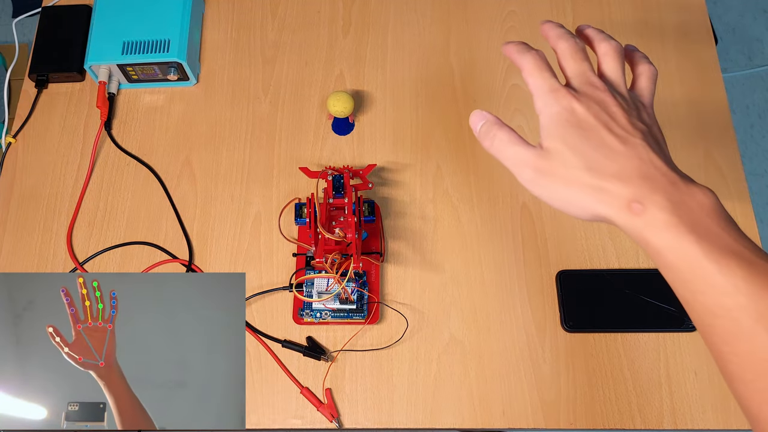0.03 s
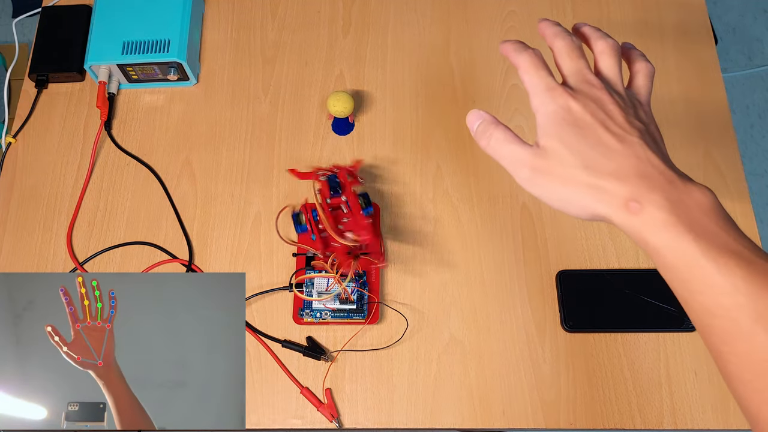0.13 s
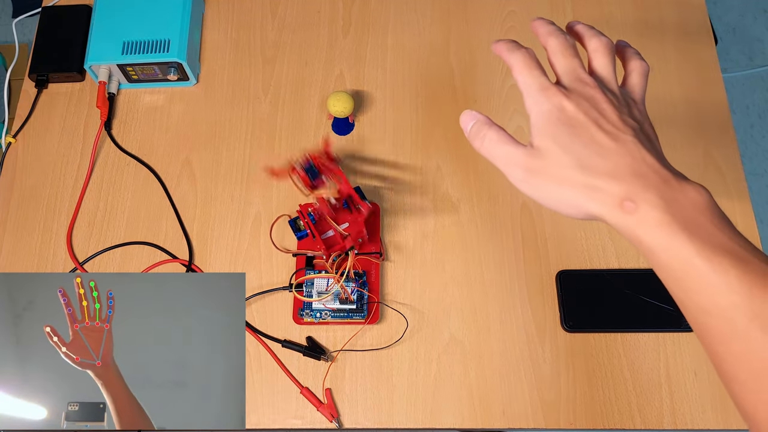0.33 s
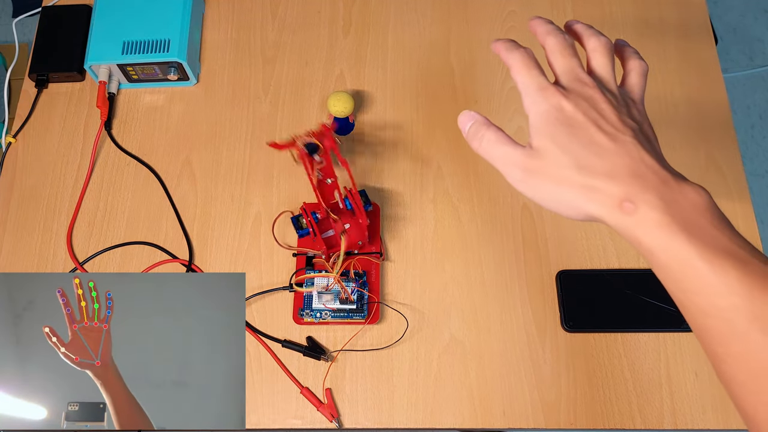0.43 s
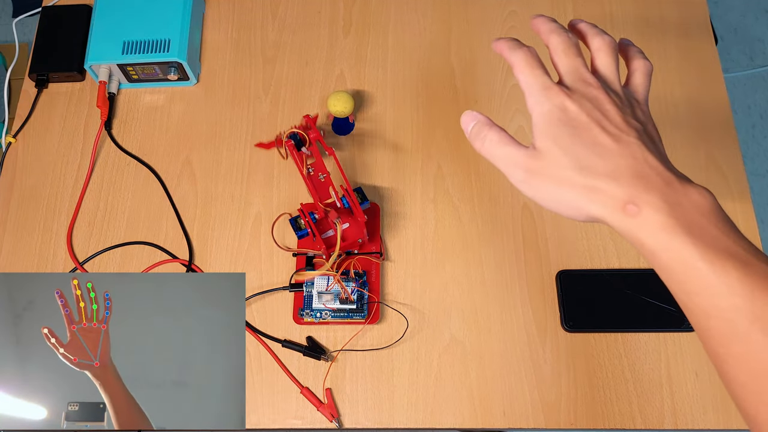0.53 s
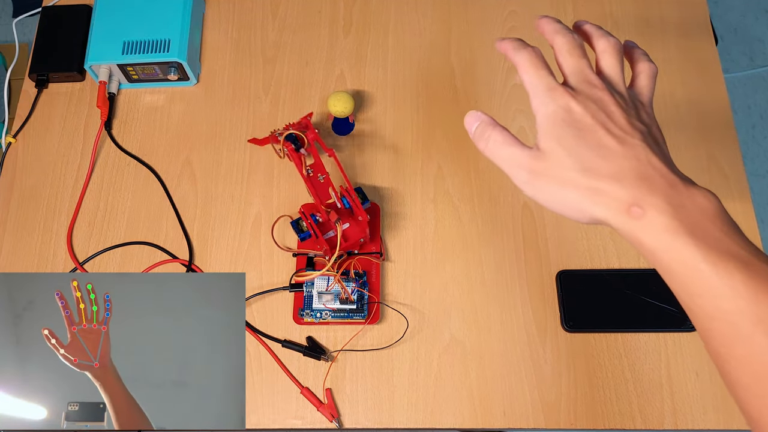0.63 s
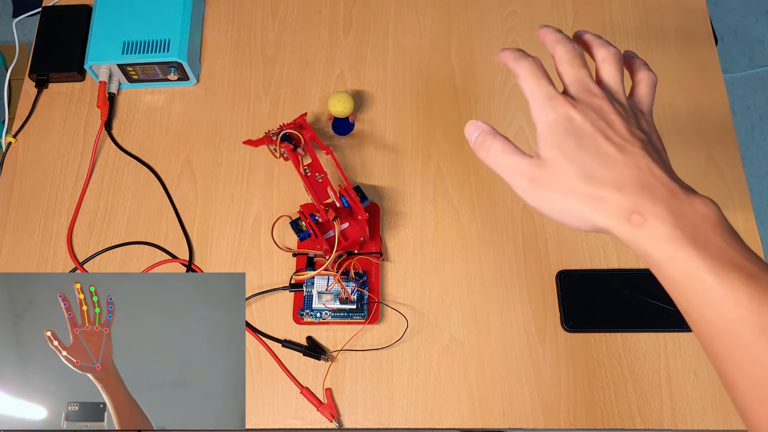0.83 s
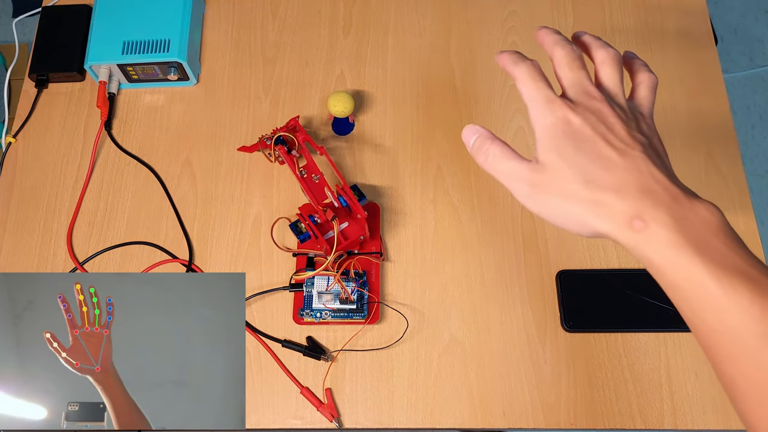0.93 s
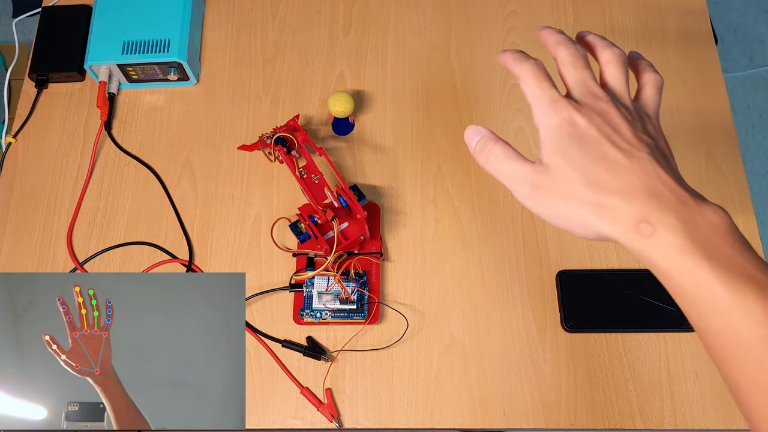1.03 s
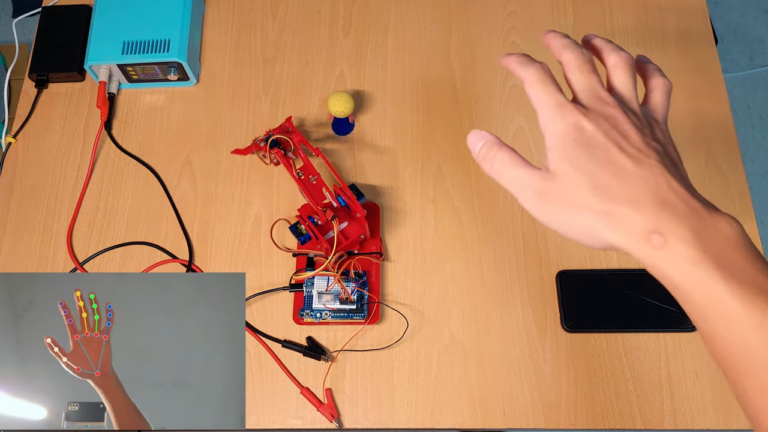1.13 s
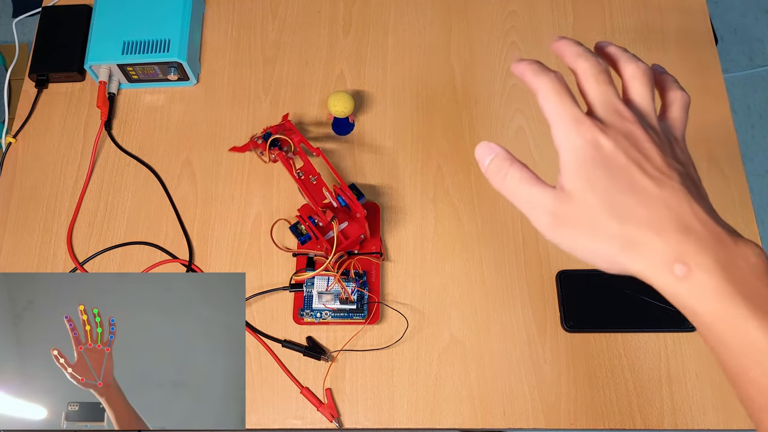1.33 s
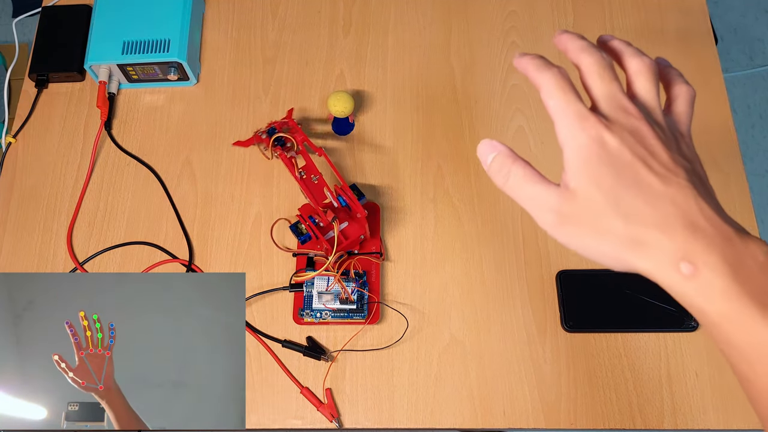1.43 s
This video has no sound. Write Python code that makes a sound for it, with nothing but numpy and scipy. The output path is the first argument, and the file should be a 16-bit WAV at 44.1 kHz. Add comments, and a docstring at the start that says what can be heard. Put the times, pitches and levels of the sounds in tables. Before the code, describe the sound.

A small robot arm's servos start whirring at about 0.2 seconds, with a low motor drone, plastic ticks and faint ringing from the wooden desk. One hard clack lands just after 0.4 seconds, and the swing dies away by 0.9. From about 1.1 to 1.5 seconds come lighter whirs and more ticks. A faint electric hum lies underneath in a bare room.

```python
"""A low electric hum lies under the air of a bare room. At 0.2 s a small plastic robot arm swings across
a wooden desk: its servo gears whir, its motor drones and slack in the joints takes up with ticks, while
jolts of the frame set the desk ringing. One hard clack lands just after 0.4 s and the swing dies away.
From about 1.1 s the arm makes a few small moves, with lighter whirs and more ticks."""
import sys
import numpy as np
from scipy import signal
from scipy.fft import rfft, irfft, next_fast_len
from scipy.io import wavfile

SR = 44100
rng = np.random.default_rng(int(sys.argv[2]) if len(sys.argv) > 2 else 0)


def wav_out(sig):
    """Save sig, one row per channel (or a flat mono array), as 16-bit PCM at SR to the path in sys.argv[1]."""
    wavfile.write(sys.argv[1], SR, np.round(np.clip(np.atleast_2d(sig).T, -1, 1) * 32767).astype(np.int16))


N = 66150
T = np.arange(N) / SR


def from_db(db):
    """Decibels to gain."""
    return 10 ** (np.asarray(db) / 20)


def unit_power(x):
    """Scale to an RMS of 1."""
    return x / np.sqrt(np.mean(x ** 2) + 1e-20)


def automation(rows):
    """One curve in time for each column after the first."""
    times, *columns = np.transpose(rows)
    return [np.interp(T, times, column) for column in columns]


def at_hz(points, hz):
    """Read a curve on a log-frequency axis."""
    freqs, values = np.transpose(points)
    return np.interp(np.log(hz + 1e-3), np.log(freqs), values)


def filtered(x, gain_at):
    """Filter by a gain given as a function of frequency."""
    size = next_fast_len(2 * N)
    hz = np.arange(size // 2 + 1) * SR / size
    return irfft(rfft(x, size) * gain_at(hz), size)[..., :N]


def eq(x, curve):
    """Apply an EQ curve in dB."""
    return filtered(x, lambda hz: from_db(at_hz(curve, hz)))


def pan(x, curve):
    """Pan each frequency by a curve of left minus right in dB."""
    return filtered(x, lambda hz: from_db(at_hz(curve, hz) * np.array([[.5], [-.5]])))


def drift(rate_hz):
    """A slow random wander with a spread of 1."""
    return unit_power(filtered(rng.standard_normal(N), lambda hz: 1 / (1 + (hz / rate_hz) ** 2)))


def ring(starts, db, hz, t60, scatter_db=4):
    """One resonance struck at each start, a little harder or softer by chance."""
    strikes = np.zeros(N)
    strikes[(starts * SR).astype(int)] = from_db(db + scatter_db * rng.standard_normal(len(starts)))
    radius, angle = from_db(-60 / (t60 * SR)), 2 * np.pi * hz / SR
    return signal.lfilter([0, np.sin(angle)], [1, -2 * radius * np.cos(angle), radius ** 2], strikes + 1e-18)


# Stereo width of the room. Each row: frequency in Hz, likeness of the two sides from 0 to 1.
STEREO_LIKENESS = [(100, 0.5), (300, 0.38), (700, 0.06), (2000, 0.02), (5000, 0.09), (14000, 0)]

def diffuse_noise():
    """White stereo noise, wide on top and narrower in the bass."""
    mid = filtered(rng.standard_normal(N), lambda hz: np.sqrt(1 + at_hz(STEREO_LIKENESS, hz)))
    side = filtered(rng.standard_normal(N), lambda hz: np.sqrt(1 - at_hz(STEREO_LIKENESS, hz)))
    return unit_power(np.array([mid + side, mid - side]))


# Colour of the room air. Each row: frequency in Hz, gain in dB.
AIR_EQ = [(25, -30.5), (55, -7.5), (85, -13), (122, 0.5), (180, -19), (280, -9), (400, -18.5), (700, -23),
          (1200, -27), (2000, -34.5), (5000, -47), (9000, -42), (15500, -45.5)]
# Where the air sits. Each row: frequency in Hz, left minus right in dB.
AIR_PAN = [(120, 9), (1000, 0.5), (3000, -0.5), (12000, -5)]
AIR_DB, HUM_HZ, HUM_DB, HUM_WAVER_DB = -63.5, 120.4, -66.5, 1

def room_tone():
    """A bed of air, lows to the left and hiss to the right, with a wavering electric hum."""
    air = pan(unit_power(eq(diffuse_noise(), AIR_EQ)), AIR_PAN)
    hum = np.sqrt(2) * np.sin(2 * np.pi * HUM_HZ * T)
    return from_db(AIR_DB) * air + from_db(HUM_DB + HUM_WAVER_DB * drift(rate_hz=8.7)) * hum


# How hard the gears work. Each row: time in seconds, level in dB.
GEAR_EFFORT = [(.178, -96.5), (.182, -52.5), (.193, -39.5), (.204, -42), (.212, -30), (.235, -37.5),
               (.285, -39.5), (.345, -38.5), (.385, -38.5), (.42, -42.5), (.465, -35), (.525, -45.5),
               (.6, -56), (.7, -57.5), (.84, -60), (.9, -68), (1.01, -69.5), (1.035, -63), (1.12, -85.5),
               (1.137, -60.5), (1.155, -58), (1.17, -53), (1.195, -55.5), (1.235, -80.5), (1.262, -69.5),
               (1.27, -58), (1.292, -55.5), (1.315, -59), (1.345, -58), (1.41, -72.5), (1.5, -62)]
# Colour of the gear train in its case. Each row: frequency in Hz, gain in dB.
GEAR_EQ = [(300, -29.5), (600, -39), (1200, -16.5), (1700, -21.5), (2400, -6.5), (3400, -5.5), (3900, -9),
           (4850, -.5), (5900, -9), (7000, -1.5), (8100, 0), (9900, -5.5), (11800, 0), (13200, -3),
           (15500, -9.5)]
# Extra colour under a light load. Each row: frequency in Hz, gain in dB.
LIGHT_LOAD_EQ = [(1900, -5.5), (3500, 6), (8300, 1.5), (12000, -4), (15500, -17)]
GEAR_DB, LIGHT_BELOW_DB, TOOTH_SPREAD_DB = 2.5, -54.5, 1
LIGHT_TEETH_PER_S, LOADED_TEETH_PER_S = 1200, 8000
DRIVE_HZ, DRIVE_DEPTH = 45.83, 0.083

def gears():
    """Tooth strikes blur into a whir that surges with the drive pulses; light work is grittier, duller."""
    effort_db, = automation(GEAR_EFFORT)
    load = .5 + .5 * np.tanh((effort_db - LIGHT_BELOW_DB) / 10)
    rate = LIGHT_TEETH_PER_S + (LOADED_TEETH_PER_S - LIGHT_TEETH_PER_S) * load
    sizes = from_db(TOOTH_SPREAD_DB * np.minimum(rng.exponential(1, N), 4)) * rng.choice([-1, 1], N)
    teeth = sizes * (rng.random(N) < rate / SR) / np.sqrt(rate)  # same power at any rate
    drive = 1 + DRIVE_DEPTH * np.sin(2 * np.pi * DRIVE_HZ * T)
    whir = unit_power(eq(teeth * drive, GEAR_EQ))
    return from_db(GEAR_DB + effort_db) * (load * whir + (1 - load) * eq(whir, LIGHT_LOAD_EQ))


# The motor through the swing. Each row: time in seconds, level in dB, pitch in Hz.
MOTOR_RUN = [(.18, -80, 107.6), (.205, -51.5, 110.8), (.29, -50, 111.8), (.34, -53.5, 112.8),
             (.375, -47, 113.8), (.45, -45.5, 110.6), (.58, -52.5, 112.4), (.7, -54.5, 113.2),
             (.8, -58, 112.3), (.88, -92.5, 108.1), (1.0, -74.5, 106.7)]
# Harmonics of its drone. Each row: multiple of the pitch, level in dB.
MOTOR_HARMONICS = [(1, -17), (2, -2.5), (3, -10.5), (4, -19.5)]
# Rumble it sends into the desk. Each row: frequency in Hz, gain in dB.
RUMBLE_EQ = [(25, -17), (60, 3), (130, -1), (250, 0), (430, -11), (560, -16), (1000, -19), (2000, -52)]
PITCH_WOBBLE, RUMBLE_DB = 0.011, 1

def motor():
    """The turning motor gives a wavering drone and a rumble while the arm swings."""
    level_db, pitch = automation(MOTOR_RUN)
    phase = 2 * np.pi * np.cumsum(pitch * (1 + PITCH_WOBBLE * drift(rate_hz=18))) / SR
    drone = sum(np.sqrt(2) * from_db(db) * np.sin(k * phase) for k, db in MOTOR_HARMONICS)
    rumble = unit_power(eq(diffuse_noise(), RUMBLE_EQ))
    return from_db(level_db) * (drone + from_db(RUMBLE_DB) * rumble)


def crack(decay_s, size):
    """A dying burst of tiny contacts with an even spectrum."""
    envelope = np.exp(-np.arange(size) / (decay_s * SR))
    burst = envelope * rng.standard_normal(size)
    for _ in range(12):  # flatten the spectrum, then restore the decay
        flat = irfft(np.exp(1j * np.angle(rfft(burst))))
        burst = envelope * np.sign(flat)
    return burst


def contact_gain(hz, tilt_db, edge_hz, pivot_hz=6170, floor_db=-20):
    """Soft contacts are duller; light ones lack lows."""
    below_edge = edge_hz / (hz + 1)
    low_cut = np.sqrt(1 / (1 + below_edge ** 8) + from_db(2 * floor_db) / (1 + below_edge ** 2))
    return low_cut * from_db(tilt_db * np.log2(np.maximum(hz, edge_hz) / pivot_hz))


# Ticks and clacks of the joints. Each row: start in seconds, level in dB, tilt in dB per octave,
# low cut in Hz, crack decay in seconds.
JOINT_HITS = [(0.208, -31, -9, 6500, 0.0037), (.2215, -35, -5.5, 1540, 0.0047),
              (0.2738, -29.5, -3.5, 1270, 0.0035), (.3603, -11.5, -0.5, 1600, 0.00091),
              (0.3696, -26, -5.5, 1520, 0.0025), (0.396, -38, 9, 1790, 0.0045),
              (.4243, -0.5, -1, 1353, .0014), (.5665, -27.5, -4, 1584, 0.0048),
              (0.625, -53, -7, 1810, 0.0057), (0.7514, -35.5, -3.5, 1659, 0.0017),
              (0.764, -46.5, -8, 1640, .003), (0.7918, -47, -10.5, 2140, 0.0013),
              (.8225, -35, 1, 2500, .0015), (.926, -47, -0.5, 2500, 0.0025),
              (1.0228, -45.5, 0, 2920, 0.0018), (1.125, -43, -10, 6960, 0.0034),
              (1.151, -36.5, -4.5, 5500, 0.0016), (1.1648, -27, -7.5, 5790, 0.0028),
              (1.184, -42, 9, 4480, 0.0011), (1.266, -33, -4.5, 5430, .004), (1.3292, -48, 4, 3020, 0.0056),
              (1.3427, -39.5, 6, 3120, 0.0019), (1.3488, -28, -6, 2960, 0.0015)]
# Colour of a crack of hard plastic. Each row: frequency in Hz, gain in dB.
CRACK_EQ = [(400, 10.5), (1000, -5), (2200, 2.5), (3300, -2.5), (4500, 4), (5600, -4.5), (7200, -1),
            (8400, -0.5), (10300, -8.5), (12000, -2), (13500, -4), (15500, -6)]
# Ring of the plastic links. Each row: pitch in Hz, level in dB, seconds to fall 60 dB.
LINK_RING = [(1782, -30.5, 0.0058), (2273, -29, 0.021), (2664, -27.5, 0.039), (3704, -26.5, 0.024),
             (4760, -24.5, 0.0097), (7650, -39, 0.0074), (11910, -16, 0.012)]
CRACK_DB = -3

def joint_clacks(size=4096):
    """Slack takes up in a joint with a brief crack and a short ring of the plastic links."""
    hits, lead = np.zeros(N + 2 * size), size // 2
    hz = np.arange(size // 2 + 1) * SR / size
    for start_s, db, tilt_db, edge_hz, decay_s in JOINT_HITS:
        gain = from_db(db + CRACK_DB + at_hz(CRACK_EQ, hz)) * contact_gain(hz, tilt_db, edge_hz)
        burst = np.pad(crack(decay_s, lead), (lead, 0))  # space for the filter to ring ahead
        start = int(start_s * SR)
        hits[start:start + size] += irfft(rfft(burst) * gain)
    hits = hits[lead:lead + N]
    starts, db, tilt_db, edge_hz, _ = np.transpose(JOINT_HITS)
    for k, (mode_hz, mode_db, t60) in enumerate(LINK_RING):
        contact_db = 20 * np.log10(contact_gain(mode_hz, tilt_db, edge_hz))
        hits += (-1) ** k * ring(starts, db + mode_db + contact_db, mode_hz, t60)
    return hits


# Jolts of the frame on the desk. Each row: start in seconds, level in dB.
FRAME_JOLTS = [(0.228, 4), (0.36, -7.5), (0.427, 3), (0.565, -1.5), (.77, -11), (1.347, -8)]
# Low ring of desk and frame. Each row: pitch in Hz, level in dB, seconds to fall 60 dB.
DESK_RING = [(58.8, -52, .5), (119.9, -42.5, .35), (168, -52, 0.34), (228.2, -50.5, 0.7),
             (297, -65.5, 0.084), (331.3, -54, 0.57), (420.8, -52, 0.19)]

def desk():
    """Starts and stops of the arm set the frame and desk ringing."""
    starts, db = np.transpose(FRAME_JOLTS)
    return sum((-1) ** k * ring(starts, db + mode_db, hz, t60)
               for k, (hz, mode_db, t60) in enumerate(DESK_RING))


# Reverb time of the bare room. Each row: frequency in Hz, seconds to fall 60 dB.
REVERB_TIME = [(300, 0.48), (2000, 0.38), (4500, 0.44), (8000, 0.32), (14000, 0.35)]
REVERB_DB, PREDELAY_S = 1.5, 0.001

def reverb(x):
    """Dense reflections that die faster in the treble."""
    noise, centres = diffuse_noise(), np.geomspace(250, 16000, 7)
    tail = 0
    for centre, weights in zip(centres, np.eye(len(centres))):
        band = filtered(noise, lambda hz: at_hz(np.c_[centres, weights], hz))
        tail += band * from_db(-60 * T / at_hz(REVERB_TIME, centre))
    fade_in = np.clip(T / PREDELAY_S - 1, 0, 1)
    tail = unit_power(tail * fade_in) / np.sqrt(N)
    return from_db(REVERB_DB) * signal.fftconvolve(x[None], tail, axes=1)[:, :N]


# The arm sits a little to the right. Each row: frequency in Hz, left minus right in dB.
ARM_PAN = [(300, -8), (1200, 1), (2200, 1), (4000, -4), (8000, -7.5), (13000, -6.5)]
GEAR_DIRECT_DB, LEFT_LAG_S, REFLECTION_SHIFT_HZ = -4, .00009, 5

def scene():
    """The mix: the arm and its shifting reflections over motor, desk and room tone."""
    whir, clacks = gears(), joint_clacks()
    direct = clacks + from_db(GEAR_DIRECT_DB) * whir  # the gears are shut in their cases
    left = np.interp(T - LEFT_LAG_S, T, direct)
    arm, shift = whir + clacks, 2 * np.pi * REFLECTION_SHIFT_HZ * T
    # Crossfading two reverbs changes the reflections, as a moving arm does.
    reflections = reverb(arm * np.cos(shift)) + reverb(arm * np.sin(shift))
    placed = pan(np.array([left, direct]) + reflections, ARM_PAN)
    return placed + motor() + desk() + room_tone()


CEILING, HIGH_CUT_HZ = .68, 15650

def record(dry):
    """Clip the highest peaks, then cut the top steeply."""
    high_cut = signal.ellip(12, .1, 80, HIGH_CUT_HZ, fs=SR, output="sos")
    return signal.sosfilt(high_cut, np.clip(dry, -CEILING, CEILING))


dry = scene()
out = record(dry)
wav_out(out)
```